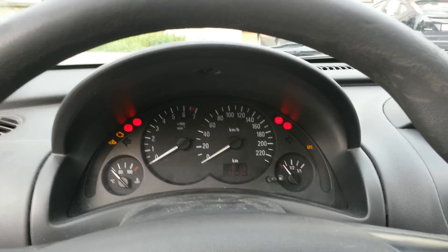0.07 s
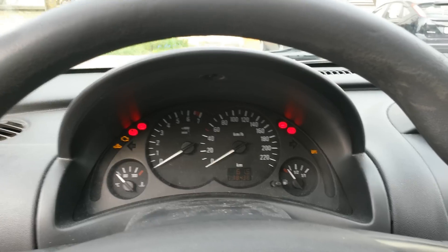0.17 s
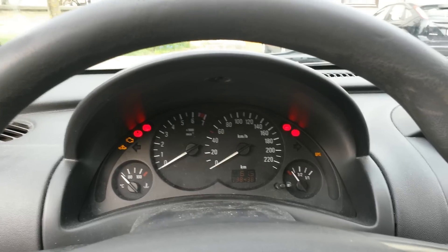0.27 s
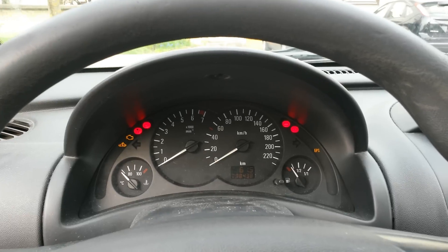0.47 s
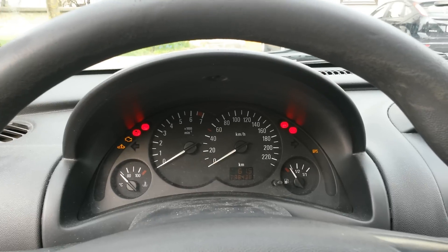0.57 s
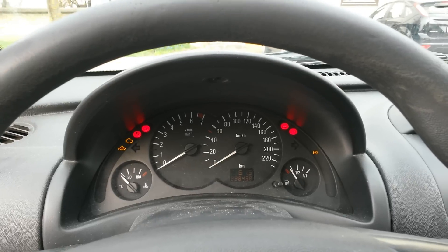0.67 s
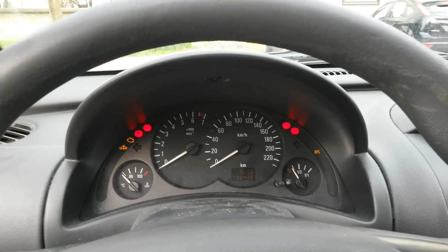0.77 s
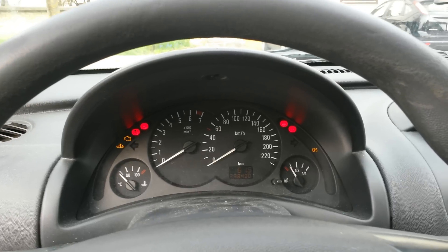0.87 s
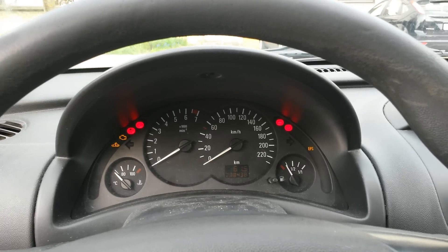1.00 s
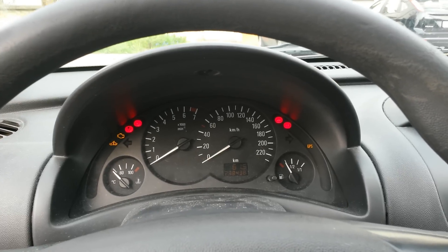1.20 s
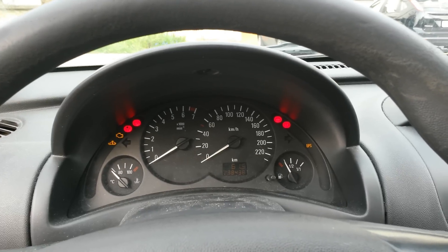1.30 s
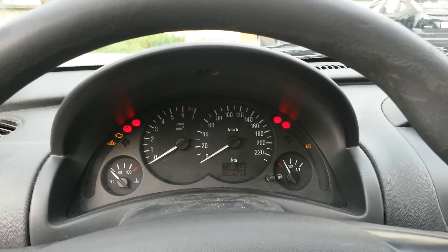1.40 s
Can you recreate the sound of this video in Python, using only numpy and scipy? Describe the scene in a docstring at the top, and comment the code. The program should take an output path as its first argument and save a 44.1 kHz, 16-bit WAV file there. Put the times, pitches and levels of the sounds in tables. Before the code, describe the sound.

An ignition lock snaps once, sharply, inside a parked car with the engine off. Before it come soft low thumps, plastic scuffs and rustling clothes; afterwards the hanging keys tick lightly together, all heard close up.

```python
"""Handling the controls in a parked car

The engine is off. Someone shifts in the seat, and soft pushes set the cabin booming in its low modes.
Plastic trim knocks, catches and scuffs; by friction, clothing rustles on the left and keys slide on
the right. The sprung ignition lock snaps once, sharply, and the hanging keys then tick together."""
import sys
import numpy as np
from scipy import signal
from scipy.fft import rfft, irfft
from scipy.io import wavfile
from scipy.ndimage import uniform_filter1d

SR = 44100
rng = np.random.default_rng(int(sys.argv[2]) if len(sys.argv) > 2 else 0)


def persist_wave(psi):
    """Save psi, clipped to +-1, as 16-bit WAV."""
    counts = np.round(np.clip(psi, -1, 1) * 32767).astype(np.int16)
    wavfile.write(sys.argv[1], SR, np.atleast_2d(counts).T)


N = 63945
TIME = np.arange(N) / SR
RING_TIME = TIME[:16384]


def amp(db):
    return 10 ** (np.asarray(db) / 20)


def unit_rms(x):
    return x / np.sqrt(np.mean(x ** 2) + 1e-20)


def at_frequency(curve, hz):
    """Interpolation on a logarithmic frequency axis."""
    f, value = np.transpose(curve)
    return np.interp(np.log(hz + 1), np.log(f + 1), value)


def envelope(curve):
    """Gain interpolated along a curve of (t/s, level/dB)."""
    return amp(np.interp(TIME, *np.transpose(curve)))


def decay(t60):
    """Exponential damping: 60 dB in t60 seconds."""
    return np.exp(-np.log(1000) * RING_TIME / t60)


def add(mix, start_s, sound):
    part = mix[:, round(start_s * SR):][:, :sound.shape[-1]]
    part += sound[..., :part.shape[1]]


def pan(side_db):
    """Constant-power gains for a level difference, left minus right."""
    gains = np.array([amp(side_db / 2), amp(-side_db / 2)])
    return gains / np.sqrt(np.mean(gains ** 2, 0))


# likeness of left and right in the cabin (f/Hz, coherence)
COHERENCE = [(50, 1), (170, 0.79), (350, 0.75), (700, 0.42), (1400, 0), (15000, 0.082)]

def colour(x, spectrum, side=None, peaks=()):
    """Spectral shaping to unit RMS; long waves reach both ears alike, so the bass is nearly mono."""
    hz = np.fft.rfftfreq(x.shape[1], 1 / SR)
    coherence = at_frequency(COHERENCE, hz)
    left, independent = rfft(x)
    right = coherence * left + np.sqrt(1 - coherence ** 2) * independent
    resonance_db = sum(lift / (1 + (2 * (hz - f) / width) ** 2) for f, width, lift in peaks)
    shaped = np.array([left, right]) * amp(at_frequency(spectrum, hz) + resonance_db) * (hz > 0)
    direction = pan(at_frequency(side, hz)) if side else 1
    return unit_rms(irfft(shaped * direction, x.shape[1]))


def noise(spectrum):
    """Stationary Gaussian noise with a given spectrum."""
    return colour(rng.standard_normal((2, N)), spectrum)


def burst(spectrum, t60, side=None, peaks=()):
    """Diffuse reverberation: a blow scatters into dense echoes that die away."""
    return colour(rng.standard_normal((2, len(RING_TIME))), spectrum, side, peaks) * decay(t60)


def ring(modes, side):
    """Free vibration in damped modes; left and right differ in phase where coherence is low."""
    out = 0
    for hz, db, t60 in modes:
        phase = rng.random() + rng.random((2, 1)) * (1 - at_frequency(COHERENCE, hz))
        gain = amp(db) * pan(at_frequency(side, hz))[:, None]
        out += gain * decay(t60) * np.sin(2 * np.pi * (hz * RING_TIME + phase))
    return out


def friction(strokes, spectrum, side, peaks=(), slips_per_s=3000, spread_db=0.5):
    """Sliding friction: tiny random slips excite a surface under strokes that swell and die."""
    slips = (rng.random(N) < slips_per_s / SR) * amp(spread_db * np.minimum(rng.exponential(1, N), 4))
    grains = rng.standard_normal((2, N)) * (unit_rms(slips) + 1.3)  # slips over a smooth bed
    power = 0
    for s, db, rise, fall in strokes:
        from_peak = np.where(TIME < s, (s - TIME) / rise, (TIME - s) / fall)
        power += (amp(db) * np.exp(-from_peak ** 1.31)) ** 2
    return colour(grains, spectrum, side, peaks) * np.sqrt(power)


# spectra of the still air and of a faint hiss (f/Hz, level/dB)
AIR_SPECTRUM = [(15, -37), (25, 2.5), (85, -9), (130, 3), (170, -10), (199, 4.5), (399, -11.5),
                (520, -22.5), (862, -20), (1250, -17), (1360, -26), (2940, -33), (14500, -34)]
HISS_SPECTRUM = [(100, -10), (500, 6.5), (1200, 1.5), (2500, -1.5), (4500, -1.5), (7000, -4.5), (12000, -4),
                 (14500, -1.5)]
# course of the hiss (t/s, level/dB)
HISS_LEVEL = [(0, -59), (.3, -58), (.6, -56), (.75, -61.5), (.92, -61.5), (1.05, -66), (1.27, -66.5),
              (1.4, -60.5)]

def cabin_air(air_db=-64.5):
    """Ambient noise: steady cabin air, and a hiss that sinks as the movement stops."""
    return amp(air_db) * noise(AIR_SPECTRUM) + noise(HISS_SPECTRUM) * envelope(HISS_LEVEL)


# spectra of the rumble of movement and the deeper sway of the body (f/Hz, level/dB)
RUMBLE_SPECTRUM = [(30, -35), (70, -3.5), (110, 1.5), (138, 1.5), (175, -6.5), (275, -10.5), (380, -19),
                   (900, -33.5), (3000, -68)]
SWAY_SPECTRUM = [(15, -54), (34, -1.5), (58, 12), (85, 1), (130, -30), (500, -61)]
# course of each (t/s, level/dB)
RUMBLE_LEVEL = [(0, -45), (.13, -58.5), (.18, -42), (.32, -43.5), (.41, -53.5), (.47, -32), (.61, -44),
                (.71, -64), (.81, -72), (.85, -49), (.96, -65.5), (1.25, -82), (1.42, -61)]
SWAY_LEVEL = [(0, -40.5), (.13, -54.5), (.2, -37.5), (.41, -48.5), (.63, -47), (.75, -60), (.88, -59),
              (1.1, -75.5)]

def body_rumble():
    """Structure-borne noise: movement shakes and rocks the car body."""
    return noise(RUMBLE_SPECTRUM) * envelope(RUMBLE_LEVEL) + noise(SWAY_SPECTRUM) * envelope(SWAY_LEVEL)


# modes of the cabin air and panels (f/Hz, level/dB, T60/s)
CABIN_MODES = [(120, -8.5, 0.15), (137.74, 0.5, 0.29), (198, -19, 0.27), (280, -11, 0.02)]
# soft pushes on the car body (t/s, level/dB, duration/s)
PUSHES = [(.006, -35.5, 0.0065), (.160, -32.5, 0.0025), (0.19, -14, 0.013), (.229, -29.5, 0.0068),
          (.2655, -26.5, 0.0061), (.313, -27.5, 0.00534), (0.45, -24.5, 0.0041), (0.4752, -16, 0.0034),
          (.549, -27.5, 0.0046), (.715, -48, 0.0037), (1.39, -59.5, 0.0041)]

def thumps(low_cut_hz=61.4):
    """Forced response: each smooth force pulse is convolved with the cabin's impulse response."""
    boom = sum(amp(db) * decay(t60) * np.sin(2 * np.pi * hz * RING_TIME) for hz, db, t60 in CABIN_MODES)
    boom = signal.sosfilt(signal.butter(2, low_cut_hz, "highpass", fs=SR, output="sos"), boom)
    out = np.zeros((2, N))
    for s, db, duration in PUSHES:
        force = np.sin(np.pi * np.minimum(RING_TIME / duration, 1)) ** 2
        add(out, s, amp(db) * signal.fftconvolve(boom, force / force.sum()))
    return out


# dull blows on plastic (t/s, level/dB, T60/s, tilt/(dB per octave))
KNOCKS = [(.169, -30, 0.019, 0), (0.305, -35.5, 0.11, 1), (0.4587, -36.5, 0.096, 2.5),
          (0.901, -49.5, 0.063, 10)]
# spectrum of struck plastic (f/Hz, level/dB)
KNOCK_SPECTRUM = [(80, -2.5), (250, 7), (420, -4), (640, 8), (760, -7.5), (930, -10), (1170, -12.5),
                  (1600, -23.5), (15000, -70)]
# direction of all trim sounds (f/Hz, left minus right/dB)
TRIM_SIDE = [(300, 0), (1500, -3.5), (4200, 10), (8000, 6), (12000, -38)]

def trim_knocks(rise_s=0.0012, pivot_hz=600):
    """Damped impact: struck plastic gives a short burst of noise with a softened onset."""
    out = np.zeros((2, N))
    onset = 1 - np.exp(-RING_TIME / rise_s)
    for s, db, t60, tilt in KNOCKS:
        spectrum = [(hz, band_db + tilt * np.log2(hz / pivot_hz)) for hz, band_db in KNOCK_SPECTRUM]
        add(out, s, amp(db) * onset * burst(spectrum, t60, TRIM_SIDE))
    return out


# the trim sticks and lets go (t/s, level/dB, tilt/(dB per octave))
CATCHES = [(.170, -49.5, -1.5), (.212, -53.5, 11), (.454, -46, 2.5), (0.489, -42.5, -1), (0.555, -54.5, 6)]
# resonances of a catch (f/Hz, level/dB, delay/s, half length/s)
CATCH_MODES = [(1520, 1, .005, .0037), (3840, -1.5, .007, .0075), (4680, -1.5, 0, .0045)]

def trim_catches(waver_hz=37.5, pivot_hz=4000):
    """Stick-slip: each release gives a short, wavering clink, its highest resonance peaking first."""
    out = np.zeros((2, N))
    t = RING_TIME - RING_TIME.mean()
    for s, db, tilt in CATCHES:
        for hz, mode_db, delay, half_length in CATCH_MODES:
            waver = waver_hz * unit_rms(uniform_filter1d(rng.standard_normal(len(t)), size=150))
            tone = np.exp(-(t / half_length) ** 2) * np.sin(2 * np.pi * np.cumsum(hz + waver) / SR)
            gain = amp(db + mode_db + tilt * np.log2(hz / pivot_hz)) * pan(at_frequency(TRIM_SIDE, hz))
            out += gain[:, None] * np.interp(TIME, s + delay + t, tone)
    return out


# strokes across the trim (peak t/s, level/dB, rise/s, fall/s)
SCUFFS = [(.171, -38, 0.0093, 0.033), (.215, -52, 0.0048, 0.052), (.459, -30.5, 0.008, 0.025),
          (.494, -42.5, 0.0046, 0.042), (.556, -39.5, 0.014, 0.016)]
# spectrum of rubbed plastic (f/Hz, level/dB)
TRIM_SPECTRUM = [(150, 8), (290, 16), (420, -30), (720, 5.5), (980, -20), (1500, -9), (2300, -12.5),
                 (4300, -18), (8000, -30), (15000, -30)]
# its resonances (f/Hz, width/Hz, lift/dB)
TRIM_PEAKS = [(599, 14, 9), (1177, 81, 15.5), (1460, 130, 5.5), (3800, 43, 3)]

def trim_scuffs():
    """Frictional excitation: rubbing drives the narrow resonances of the plastic."""
    return friction(SCUFFS, TRIM_SPECTRUM, TRIM_SIDE, TRIM_PEAKS)


# strokes of clothing (peak t/s, level/dB, rise/s, fall/s, resonance f/Hz)
RUSTLES = [(0.174, -55.5, 0.032, 0.029, 5140), (.217, -55.5, 0.01, 0.011, 4070),
           (0.238, -53, 0.01, 0.019, 4940), (0.301, -52, 0.011, 0.015, 3370),
           (.357, -55.5, 0.027, 0.019, 4900), (.457, -52.5, 0.026, 0.029, 5300),
           (0.498, -48, 0.037, 0.023, 5500), (.556, -54.5, 0.012, 0.022, 4300),
           (0.635, -53.5, 0.0074, 0.014, 4300), (.745, -71, 0.046, 0.066, 4000)]
# spectrum of rubbed cloth (f/Hz, level/dB)
CLOTH_SPECTRUM = [(300, -28), (1500, -15), (2700, -3.5), (3800, 1), (4700, 3), (5400, 0), (6300, -17),
                  (15000, -16)]
# its direction (f/Hz, left minus right/dB)
CLOTH_SIDE = [(1000, -40), (4300, 19), (12000, -16)]

def cloth_rustles(width_hz=250, lift_db=7.5):
    """Friction of fabric: each stroke rasps around a resonance of its own."""
    return sum(friction([stroke], CLOTH_SPECTRUM, CLOTH_SIDE, [(hz, width_hz, lift_db)])
               for *stroke, hz in RUSTLES)


# keys sliding in the hand (peak t/s, level/dB, rise/s, fall/s)
SLIDES = [(.184, -44, 0.018, 0.017), (.306, -54, 0.0023, 0.016), (.436, -50.5, 0.022, 0.014),
          (.466, -45.5, 0.019, 0.034), (.502, -37.5, 0.02, 0.02), (.562, -53.5, 0.008, 0.021),
          (1.308, -50.5, 0.0048, 0.011), (1.324, -63.5, .006, 0.067)]
# spectrum of rubbed steel (f/Hz, level/dB)
STEEL_SPECTRUM = [(500, -8), (3000, -18), (6500, -11), (9500, -12.5), (11600, 0), (12800, -5), (14500, -10)]
# direction of all key sounds (f/Hz, left minus right/dB)
KEY_SIDE = [(500, -30), (4500, 10.5), (7000, -2.5), (11500, -28), (14500, -10)]

def key_slides():
    """Friction of steel: sliding keys radiate mostly in the high treble."""
    return friction(SLIDES, STEEL_SPECTRUM, KEY_SIDE)


# two faint contacts as the lock slips, then the landing and its bounces (t/s, level/dB)
LOCK_CONTACTS = [(0.8246, -31.5), (0.8233, -44.5), (0.8273, -19.5), (0.8294, -27.5), (.8315, -27.5),
                 (0.8319, -20), (.8357, -26), (.8376, -34)]
# spectra of a contact and of the lock's plastic shroud (f/Hz, level/dB)
LOCK_SPECTRUM = [(120, -63), (200, -10.5), (517, 0.5), (653, -2.5), (1060, -29), (1220, -7), (1630, -9),
                 (1910, -4.5), (2550, -10.5), (3160, -10), (4770, -9.5), (7340, -15), (10100, -1.5),
                 (11700, -2.5), (14500, -11)]
SHROUD_SPECTRUM = [(100, -26), (245, 5), (380, -19), (650, 16.5), (850, 2.5), (1200, -2.5), (1700, -8),
                   (5000, -28)]
# peaks and a dip that colour every contact (f/Hz, width/Hz, lift/dB)
LOCK_PEAKS = [(4800, 550, 5), (9400, 500, -2), (12200, 710, 1.5)]
# modes of the lock and its housing (f/Hz, level/dB, T60/s)
LOCK_MODES = [(240, -16.5, 0.15), (650, -5.5, 0.08), (1181, -12, 0.098), (4300, -26, 0.094),
              (4620, -19, 0.12), (9310, -7, 0.071), (9730, -19, .055), (11180, -3, 0.044),
              (11870, 6, 0.043), (12250, 0, 0.064), (12900, -4, 0.043)]
# direction of the lock (f/Hz, left minus right/dB)
LOCK_SIDE = [(300, 0.5), (900, -6), (2200, -3.5), (3500, 9), (4700, 8), (6500, 0), (9000, -13),
             (11700, -25), (14500, -10)]

def ignition_lock(low_cut_hz=1720, echo_db=-18, ring_db=-30.5, shroud_db=-35):
    """Impact and rebound: contacts crack and echo in the cabin; the hardest rings metal and shroud."""
    out = np.zeros((2, N))
    highpass = signal.butter(2, low_cut_hz, "highpass", fs=SR, output="sos")
    for s, db in LOCK_CONTACTS:
        crack = burst(LOCK_SPECTRUM, t60=0.006, side=LOCK_SIDE, peaks=LOCK_PEAKS)
        echo = burst(LOCK_SPECTRUM, t60=0.092, side=LOCK_SIDE, peaks=LOCK_PEAKS)
        add(out, s, amp(db) * (signal.sosfilt(highpass, crack) + amp(echo_db) * echo))
    landing_s, _ = max(LOCK_CONTACTS, key=lambda contact: contact[1])
    add(out, landing_s, amp(ring_db) * ring(LOCK_MODES, LOCK_SIDE))
    add(out, landing_s, amp(shroud_db) * burst(SHROUD_SPECTRUM, t60=0.06, side=LOCK_SIDE))
    return out


# hanging keys touch (t/s, level/dB, relative ring level/dB, frequency ratio)
TICKS = [(0.897, -54.5, -23, 0.77), (1.359, -49.5, -14, 0.81), (1.378, -56, -9, 0.66),
         (1.410, -49.5, -22, 1.1), (1.4237, -40.5, -3.5, 1), (1.428, -48, -6, 0.95),
         (1.4445, -50.5, -14, 1.04)]
# modes of the key in the loudest clink (f/Hz, level/dB, T60/s)
KEY_MODES = [(4040, -7, .035), (5930, 1, 0.1), (6340, -9, 0.04), (10100, -0.5, 0.072), (11390, -8, .03),
             (11600, 1, 0.04)]
# spectrum of a tick (f/Hz, level/dB)
TICK_SPECTRUM = [(500, -50), (2500, -23), (4300, -4.5), (6000, -3.5), (7500, -16), (9500, -7), (11200, 7),
                 (12800, -3), (14500, -8)]

def key_ticks():
    """Collision of small plates: a bright tick and a short ring, each key at its own pitch."""
    out = np.zeros((2, N))
    for s, db, ring_db, ratio in TICKS:
        modes = [(hz * ratio, mode_db, t60) for hz, mode_db, t60 in KEY_MODES]
        tick = burst(TICK_SPECTRUM, t60=0.051, side=KEY_SIDE)
        add(out, s, amp(db) * (tick + amp(ring_db) * ring(modes, KEY_SIDE)))
    return out


def scene():
    """Superposition: the sources add, with the car body's sounds a little to the right."""
    air = cabin_air()
    body = (body_rumble() + thumps()) * pan(side_db=-2)[:, None]
    handling = trim_knocks() + trim_catches() + trim_scuffs() + cloth_rustles() + key_slides()
    return air + body + handling + ignition_lock() + key_ticks()


def record(dry, cutoff_hz=14650):
    """Band limiting: a linear-phase low-pass filter removes the highest treble."""
    taps = signal.firwin(401, cutoff_hz, window=("kaiser", 8), fs=SR)
    return signal.oaconvolve(dry, taps[None], "same")


dry = scene()
out = record(dry)
persist_wave(out)
```